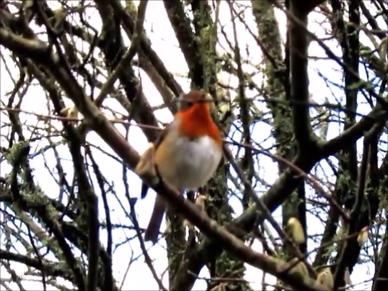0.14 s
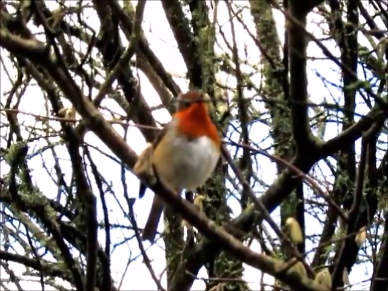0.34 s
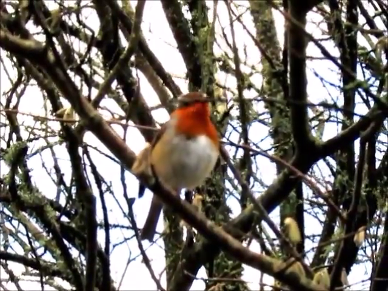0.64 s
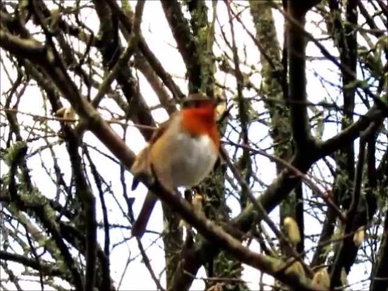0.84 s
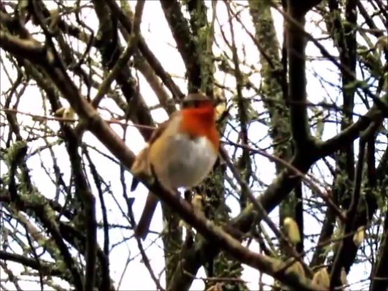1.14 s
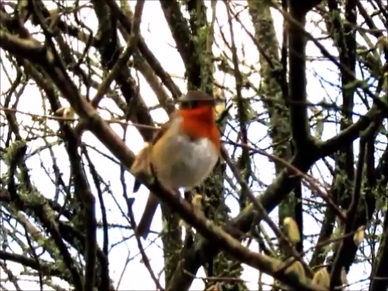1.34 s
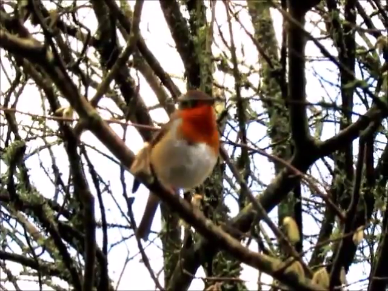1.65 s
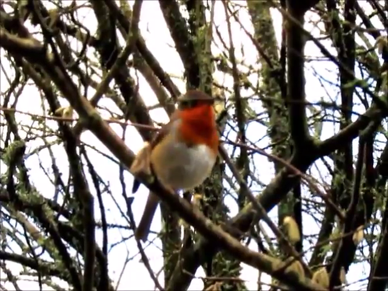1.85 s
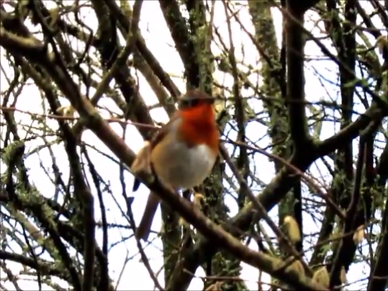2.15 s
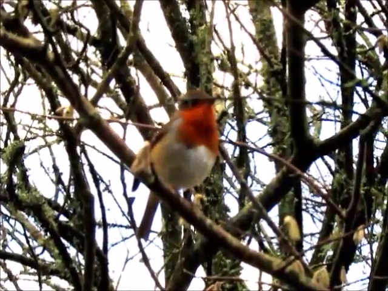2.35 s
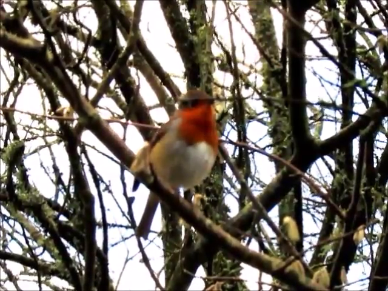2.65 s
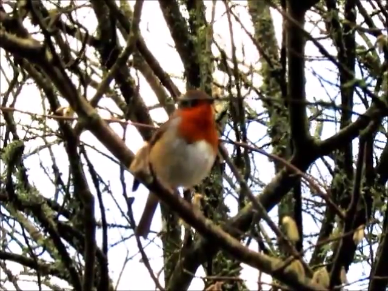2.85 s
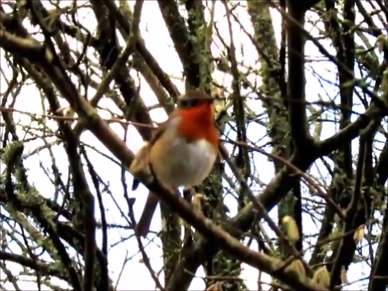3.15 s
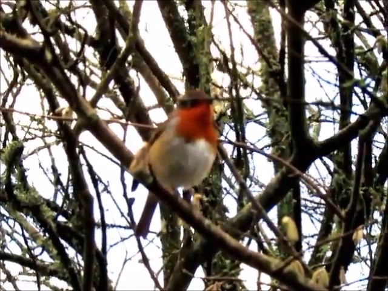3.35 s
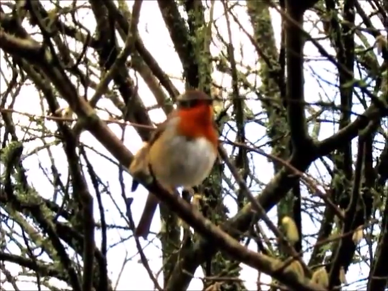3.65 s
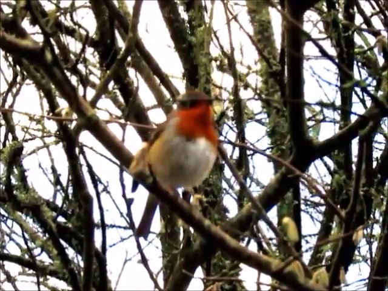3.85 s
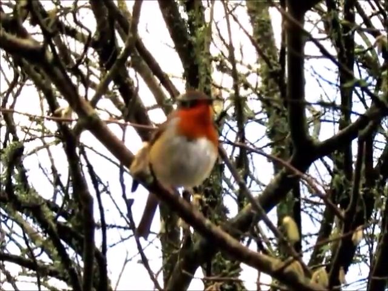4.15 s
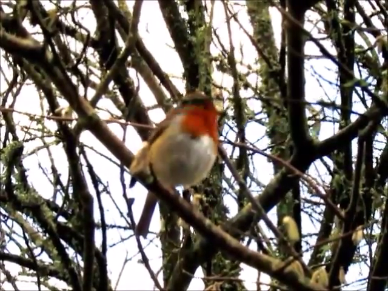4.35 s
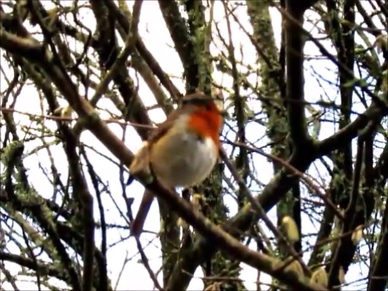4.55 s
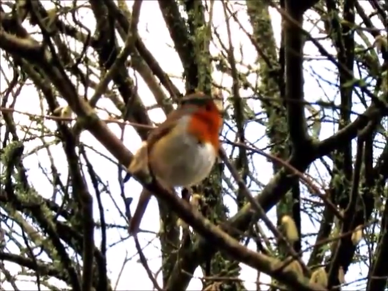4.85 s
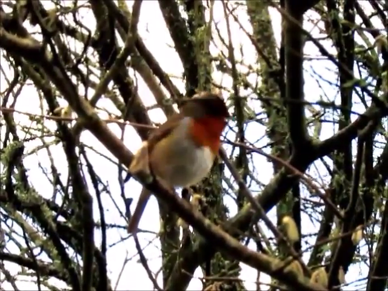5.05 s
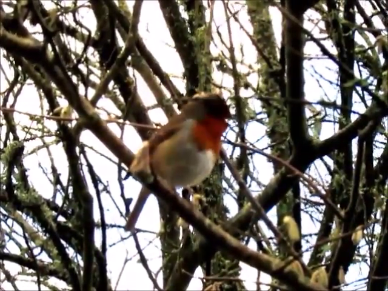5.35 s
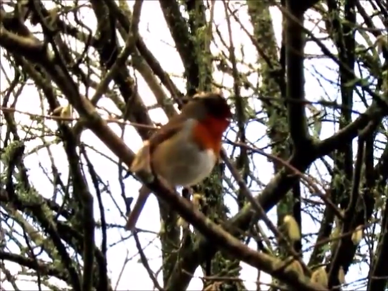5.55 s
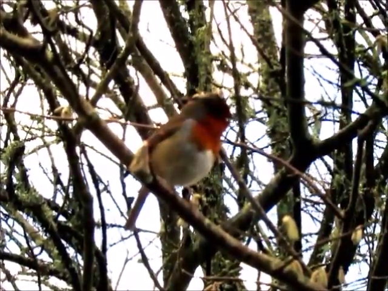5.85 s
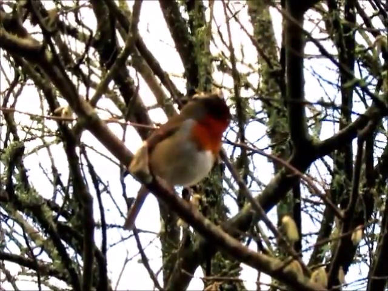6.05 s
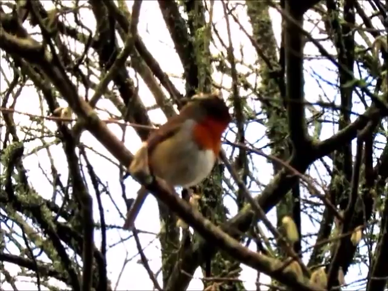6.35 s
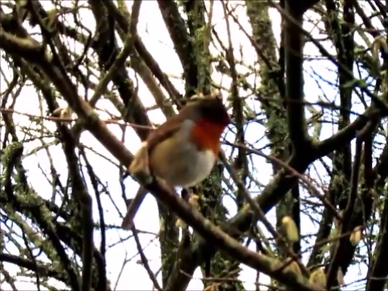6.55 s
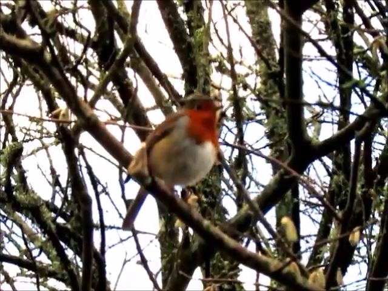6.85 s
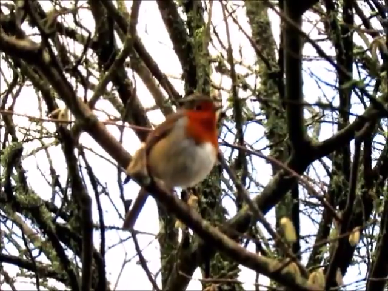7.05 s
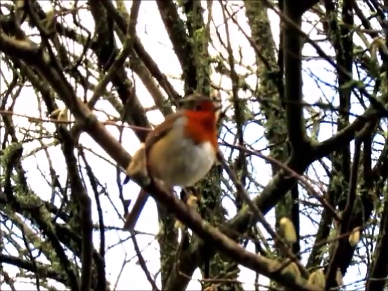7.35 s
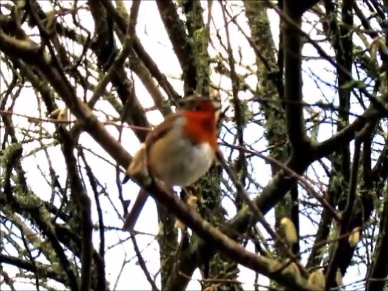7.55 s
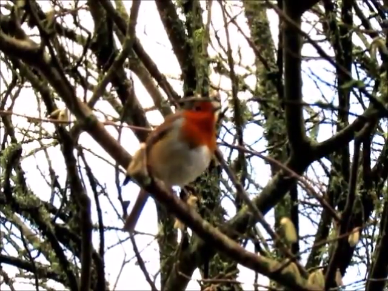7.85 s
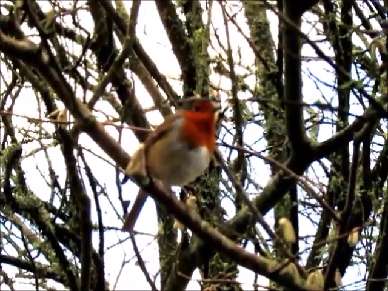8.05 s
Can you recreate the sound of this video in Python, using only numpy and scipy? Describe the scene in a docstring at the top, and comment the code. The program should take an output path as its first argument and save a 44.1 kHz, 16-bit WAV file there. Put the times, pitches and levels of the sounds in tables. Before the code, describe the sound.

Outdoors among bare branches, a close robin opens with a thin, very high whistle, then quick chips and slurs ending in a fuller, lower whistle. A fainter bird twitters in the pause. The robin returns with two tall falling calls and a fast two-toned warbling run that fades away. Soft traffic rumble and a low hum continue underneath. The song is near and almost central, with light woodland echo.

```python
"""In a bare thicket a robin sings two phrases: thin whistles, quick slurs and a run of two-voiced arches.
Each note is a gliding tone; mild nonlinearity adds overtones and rasp, and trunks and twigs scatter it.
A second bird, made of fainter slurs, answers in the pause and once more after the song.
Behind them lie shaped-noise traffic, an engine pulling through its gears as gliding tones,
a low wavering hum with its octave, and two small ticks of decaying noise."""
import sys
import numpy as np
from scipy import signal
from scipy.fft import rfft, irfft, next_fast_len
from scipy.io import wavfile
from scipy.ndimage import uniform_filter1d

SR = 44100
rng = np.random.default_rng(int(sys.argv[2]) if len(sys.argv) > 2 else 0)


def master(y):
    """Save y as 16-bit WAV."""
    cut = np.clip(np.atleast_2d(y).T, -1, 1)
    pcm = np.round(cut * 32767)  # scale
    wavfile.write(sys.argv[1], SR, pcm.astype(np.int16))


N = 361171
TIME = np.arange(N) / SR

# Spectrum of outdoor air and tyres. Each row: frequency in Hz, relative density in dB per Hz.
AIR = [(240, -23.5), (400, -5.5), (490, -3.5), (550, -3), (650, -5.5), (990, -6.5), (1450, -12),
       (2000, -20), (2700, -29), (4800, -34.5), (7800, -32.5), (10500, -34), (15500, -41.5)]
# Spectrum of the traffic drone. Each row: frequency in Hz, relative density in dB per Hz.
RUMBLE = [(50, -23), (90, -5.5), (180, -8), (212, -6.5), (238, 1.5), (265, -2), (300, -1), (345, -2.5),
          (410, -15), (560, -50.5)]
# Spectrum of the deepest traffic. Each row: frequency in Hz, relative density in dB per Hz.
DEEP = [(18, -22.5), (35, -1), (52, 7), (64, 13), (80, -5), (110, -32.5)]
# Course of the deepest traffic. Each row: time in seconds, level in dB before DEEP_LIFT_DB.
DEEP_LEVEL = [(0, -60), (.9, -62), (1.07, -69), (1.3, -58.5), (3.25, -62), (3.55, -66), (4, -61.5),
              (5.55, -59), (6.7, -64), (8.19, -66)]
# Swell of the traffic. Each row: time in seconds, change of the drone in dB, change of the tyres in dB.
TRAFFIC = [(0, -.5, 0.5), (.9, -1.5, 1.5), (2.2, -1, -0.1), (3.3, 0, 0.5), (4.3, -0.2, -0.6), (5.8, 0, 0.5),
           (6.801, 2, 0), (8.19, -0.5, -0.3)]
AIR_DB, DRONE_DB, DEEP_LIFT_DB = -56.5, -52.5, 2
# Likeness of left and right in the background. Each row: frequency in Hz, correlation (no unit).
LIKENESS = [(60, 1), (90, 1), (130, 0.7), (290, 0.75), (450, -0.36), (700, -0.073), (1400, -0.22),
            (3000, 0.26), (7000, 0.37), (15000, 0.11)]

# Pulls of the distant engine. Each row: start in seconds, length in seconds, first firing rate in Hz,
# last firing rate in Hz, level in dB before ENGINE_LIFT_DB.
ENGINE_PULLS = [(1.299, 1.15, 68, 83.5, -62.5), (2.804, 0.75, 58, 61.8, -62.5),
                (3.8, 2.05, 65.5, 79.1, -62), (7.001, 0.97, 63, 63.1, -60)]
ENGINE_LIFT_DB = 2.5
HUM_HZ, HUM_DB = 274, -61.5
HUM_OCTAVE_START_DB, HUM_OCTAVE_RISE_DB_PER_S = -77.5, 1.23
# Dry ticks. Each row: start in seconds, relative level in dB, decay constant in seconds,
# upper corner of the spectrum in Hz.
TICKS = [(0.1274, -41.5, 0.0024, 3150), (3.948, -53, 0.0033, 9150)]

# Colour of the scattered sound. Each row: frequency in Hz, gain in dB.
SCATTER = [(1500, 0), (2600, -4.5), (3600, 3), (5000, 1.5), (6400, 1), (8000, -3), (10000, -1),
           (15000, -6.5)]
# Trunk echoes. Each row: delay in seconds, level in dB, left minus right in dB.
TRUNKS = [(.0096, -16.5, 6), (.016, -15.5, 1), (0.0178, -14, -8), (.031, -28, 8)]
LATE_DB, LATE_T60_S = -20, 0.85  # faint echo from trees further off, relative to the early twigs

# Short scoops of the distant bird. Each row: start in seconds, lowest pitch in Hz, level in dB.
FAR_SCOOPS = [(2.979, 4880, -74), (3.02, 5900, -71.5), (3.083, 5980, -70.5), (3.215, 6600, -65.5),
              (3.264, 5700, -69), (3.414, 3890, -70), (3.449, 3290, -63.5), (3.542, 3010, -68),
              (3.617, 3400, -65)]
# Long notes of the distant bird. Each row: start in seconds, length in seconds, start pitch in Hz,
# middle pitch in Hz, end pitch in Hz, level in dB, swell from start to end in dB.
FAR_SLURS = [(3.66, .31, 3820, 4120, 4200, -75, -20), (7.70, .133, 1420, 1544, 1440, -65, -4)]
FAR_TRIM_DB = -0.5  # direct sound only
SCOOP_S, SCOOP_SWELL_DB = 0.0305, -9.5
SCOOP_FROM, SCOOP_TO = 1.2, 1.05  # start and end pitch against the row's pitch

# First held whistle. Each row: time in seconds, pitch in Hz, level in dB before WHISTLE_TRIM_DB.
THIN_WHISTLE = [(1.11, 9100, -74), (1.18, 8450, -51.5), (1.215, 8200, -57), (1.248, 8240, -41),
                (1.29, 8070, -40.5), (1.32, 8200, -60.5), (1.362, 8090, -36), (1.398, 7950, -32),
                (1.455, 8020, -47), (1.5, 7980, -45), (1.535, 7880, -74)]
# Second, lower whistle. Each row: time in seconds, pitch in Hz, level in dB before WHISTLE_TRIM_DB.
FULL_WHISTLE = [(2.271, 3150, -40), (2.294, 3275, -31.5), (2.321, 3143, -27), (2.345, 3121, -30.5),
                (2.384, 3096, -26.5), (2.399, 3190, -32), (2.436, 3150, -30), (2.452, 3186, -35.5),
                (2.486, 3160, -50)]
WHISTLE_TRIM_DB = -0.7
# Single-voiced slurs. Each row: start in seconds, length in seconds, start pitch in Hz,
# middle pitch in Hz, end pitch in Hz, middle level in dB, swell from start to end in dB.
SLURS = [ (1.613, 0.02, 3540, 3226, 4000, -38.5, 0), (1.635, 0.026, 3360, 2640, 2150, -51, -11),
         (1.66, 0.0094, 3260, 3760, 4200, -48, 3), (1.665, 0.014, 2450, 2210, 2230, -51, -27),
         (1.695, 0.011, 3630, 4130, 3960, -42, -2), (1.701, .008, 3280, 3050, 2850, -38, -7),
         (1.722, .011, 4850, 3730, 3870, -38, 6), (1.834, .024, 1770, 1642, 1510, -53.5, -1),
         (1.878, .016, 3870, 2800, 2430, -40, 3.5), (1.963, 0.061, 2124, 1850, 1950, -53, 13),
         (2.023, 0.027, 1900, 2107, 1820, -51, 7), (2.269, 0.015, 3880, 3680, 3640, -45.5, 2),
         (2.417, 0.031, 3560, 4000, 4220, -45.5, -5), (2.491, .032, 3520, 3020, 2740, -34.5, -10.5),
         (2.516, 0.058, 2730, 2380, 2310, -44.5, -18), (5.42, 0.019, 5650, 6070, 6050, -39.5, -14.5),
         (5.773, 0.029, 5450, 5750, 5240, -41.5, 14), (5.781, 0.058, 6380, 5770, 4300, -41.5, -3),
         (5.822, 0.02, 3900, 4040, 4270, -43, 7), (6.279, 0.057, 4750, 4560, 4360, -63, -4),
         (6.323, 0.105, 4920, 4960, 4990, -70, -16)]
SLUR_EDGE_DB = -3.5  # a slur is softer at its ends

# Chips. Each row: start in seconds, rise in seconds, fall in seconds, crest pitch in Hz, end pitch in Hz,
# crest level in dB, top pitch of the flick in Hz, level of the flick in dB.
CHIPS = [(1.713, .019, 0.0094, 4075, 2495, -34, 5010, -42),
         (1.788, .0136, .0165, 3740, 2337, -31.5, 4840, -35.5),
         (1.942, .013, 0.0083, 2820, 2110, -38, 5340, -42.5),
         (2.121, 0.022, 0.053, 3550, 2175, -33.5, 4600, -42)]
FLICK_FROM_HZ, FLICK_SHARE = 3200, .68  # the flick takes this share of the rise
CHIP_ENTRY_SHARE, CHIP_ENTRY_RATIO = 0.33, 0.76  # entry time within the rise; entry pitch against crest
CHIP_ENTRY_DB, CHIP_END_DB = -4.5, -13.5  # against the crest

# Tall calls that open the second phrase. Each row: start in seconds, length in seconds,
# start pitch in Hz, crest pitch in Hz, level in dB, swell from start to end in dB.
TALL_CALLS = [(4.507, 0.076, 5200, 7490, -55, 9), (4.711, 0.083, 3830, 7450, -47, 7.5)]
TALL_RISE_S, TALL_PLUNGE_S, TALL_START_DB = .018, 0.019, 7  # the start is lifted by these dB
TALL_KNEE_HZ, TALL_END_HZ = 4680, 2870

# Two-voiced arches. Each row: start in seconds, length in seconds, share spent rising (no unit),
# crest pitch of the lower voice in Hz, distance of the upper voice in Hz, lower level in dB,
# upper against lower level in dB, swell of the lower voice in dB, closing drop of the lower voice in Hz.
ARCHES = [(4.873, .078, 0.48, 4530, 654, -38.5, -2, 12, 1200),
          (4.991, .044, 0.73, 4090, 616, -40, 0, 6, 350),
          (5.067, 0.049, 0.6, 4255, 480, -35, -4.5, 0, 1200),
          (5.140, 0.05, 0.7, 3980, 566, -37.5, -5.5, -9, 700),
          (5.216, .044, .7, 4220, 438, -39, -4, -3, 250),
          (5.297, 0.052, 0.83, 4560, 757, -42.5, -3, -15, 450)]
ARCH_FOOT_HZ, ARCH_DROP_SHARE, ARCH_EDGE_DB = 2893, .2, -7

# Swoops. Each row: start in seconds, rise in seconds, sag in seconds, crest pitch in Hz, end pitch in Hz,
# exponent of the sag (no unit), crest level in dB, swell over the sag in dB,
# pitch ratio of the lower voice (no unit), its relative level in dB.
SWOOPS = [(5.391, 0.016, 0.067, 6150, 4280, 2.1, -35, -12, .655, -7),
          (5.521, 0.018, 0.044, 6230, 5320, 1.05, -38.5, 6, 0.78, -8),
          (5.641, .025, .04, 6140, 5370, 1.09, -38, -1.5, .83, -7)]
SWOOP_FOOT_HZ, SWOOP_FOOT_DB = 3080, -8.5

# Closing three-note figures. Each row: start in seconds, lead pitch in Hz, high pitch in Hz,
# lead level in dB, high level in dB, low level in dB.
FIGURES = [(5.885, 5700, 6380, -45, -38, -44.5), (6.028, 5040, 6220, -54.5, -49, -45),
           (6.153, 5150, 5710, -59, -53.5, -49.5)]
LEAD_S, HIGH_AT_S, HIGH_S, LOW_AT_S, LOW_S = 0.044, .034, 0.0304, .058, 0.0225
LEAD_FALL, HIGH_FALL, LOW_FALL = 0.023, 0.046, .14  # share of the pitch lost over each note
LOW_RATIO = .745  # low against high pitch

# Octave overtone as the open beak radiates it. Each row: frequency in Hz, gain in dB.
BEAK = [(4000, -46), (5200, -42), (6500, -36.5), (7500, -27), (9000, -24.5), (10200, -14), (11400, -24.5),
        (13000, -18), (15500, -35)]
# Difference between the two microphones. Each row: frequency in Hz, left minus right in dB.
MIC_BALANCE = [(150, 0), (700, 1.5), (1400, 1), (3100, 0.5), (5200, 0.5), (8000, 0), (12500, 1)]
TOP_HZ = 15700


def undb(db):
    """Logarithmic level: decibels become an amplitude gain."""
    return 10 ** (np.asarray(db) / 20)


def unit(x):
    """Normalisation of power: scale to an rms of one."""
    return x / np.sqrt(np.mean(x ** 2))


def bin_hz():
    """Discrete spectrum: the frequency of every FFT bin."""
    return np.fft.rfftfreq(next_fast_len(N), 1 / SR)


def on_bins(points):
    """Interpolation along log frequency: read (Hz, value) points at every FFT bin."""
    hz, value = np.transpose(points)
    return np.interp(np.log(bin_hz() + 1), np.log(hz), value)


def shape(x, gain):
    """Linear filtering: weight every FFT bin by a gain."""
    size = next_fast_len(N)
    return irfft(rfft(x, size) * gain, size)[..., :N]


def walk(rate):
    """Band-limited modulation: a smooth random wander, `rate` knots a second, with a spread near one."""
    knots = rng.standard_normal(int(N / SR * rate) + 2)
    wander = np.interp(TIME * rate, np.arange(len(knots)), knots)
    return 1.272 * uniform_filter1d(wander, int(SR / rate / 2) + 1)


def pan(db):
    """Interaural level difference: left and right gains."""
    return undb(np.array([[db], [-db]]) / 2)


def progress(length_s):
    """Normalised time: from 0 to 1 over a length of time."""
    return np.linspace(0, 1, max(int(length_s * SR), 8))


def add(track, start, hz, db, fade_s, waver):
    """Phase is the integral of frequency: add a gliding tone with soft ends to a complex track."""
    begin = int(start * SR)
    span = slice(begin, min(begin + len(hz), N))
    count = span.stop - span.start
    t = np.arange(len(hz)) / SR
    gate = np.sin(np.pi / 2 * np.clip(np.minimum(t, t[-1] - t) / fade_s, 0, 1)) ** 2
    phase = 2 * np.pi * np.cumsum(hz[:count] * (1 + waver[span])) / SR
    amplitude = np.sqrt(2) * undb(db) * gate  # the level is the rms of the real part
    track[span] += amplitude[:count] * np.exp(1j * phase)


def held(curves, fade_s, waver):
    """Frequency and amplitude modulation: tones that follow (s, Hz, dB) curves."""
    track = np.zeros(N, complex)
    for curve in curves:
        s, hz, db = np.transpose(curve)
        t = np.arange(max(s[0], 0), s[-1], 1 / SR)
        add(track, t[0], np.interp(t, s, hz), np.interp(t, s, db), fade_s, waver)
    return track


def sing(notes, waver):
    """Superposition of (start, pitches, levels) notes; longer ones start more softly."""
    track = np.zeros(N, complex)
    for start, hz, db in notes:
        fade_s = max(.0022, .1 * len(hz) / SR)
        add(track, start, hz, db, fade_s, waver)
    return track


def diffuse(spectrum):
    """Diffuse field: mid and side noise set the left-right correlation at each frequency."""
    likeness = np.clip(on_bins(LIKENESS), -.99, .99)
    gain = undb(on_bins(spectrum))
    mid = shape(rng.standard_normal(N), gain * np.sqrt(1 + likeness))
    side = shape(rng.standard_normal(N), gain * np.sqrt(1 - likeness))
    return np.array([mid + side, mid - side]) / np.std(mid)


def traffic():
    """Incoherent sum of noise bands: a deep swell, a drone and a wash of tyres under even hiss."""
    deep_db = DEEP_LIFT_DB + np.interp(TIME, *np.transpose(DEEP_LEVEL))
    deep = diffuse(DEEP) * undb(deep_db + 2.0 * walk(7.2))
    s, drone_db, tyres_db = np.transpose(TRAFFIC)
    drone = diffuse(RUMBLE) * undb(DRONE_DB + np.interp(TIME, s, drone_db) + 1.06 * walk(6))
    air = diffuse(AIR) * undb(AIR_DB)
    # only the tyre band swells; the hiss above it stays even
    wash = shape(air, on_bins([(1800, 0.52), (3000, 0)]))  # linear gain
    swell = undb(np.interp(TIME, s, tyres_db) + 0.395 * walk(4.84))
    return deep + drone + air + wash * (swell - 1)


def engine():
    """Periodic firing: a tone at the firing rate glides over each pull in a gear."""
    pulls = []
    for s, length, from_hz, to_hz, db in ENGINE_PULLS:
        pulls.append([(s, from_hz, db), (s + length, to_hz, db)])
    firing = held(pulls, 0.13, 0.0056 * walk(9.43))
    return firing.real * undb(ENGINE_LIFT_DB + 0.79 * walk(12))


def hum():
    """Harmonic pair: a wavering fundamental and its octave, which slowly grows stronger."""
    phase = 2 * np.pi * np.cumsum(HUM_HZ * (1 + 0.00395 * walk(6))) / SR
    fundamental = undb(HUM_DB + 1.8 * walk(1.2)) * np.sin(phase)
    octave_db = HUM_OCTAVE_START_DB + HUM_OCTAVE_RISE_DB_PER_S * TIME
    octave = undb(octave_db + 2 * walk(0.904)) * np.sin(2 * phase)
    return np.sqrt(2) * (fundamental + octave)


def ticks():
    """Damped transients: noise bursts with a sharp onset that die within milliseconds."""
    out = np.zeros((2, N))
    for s, db, decay, top_hz in TICKS:
        age = np.maximum(TIME - s, 0)
        colour = undb(on_bins([(200, 0), (1500, -3), (top_hz, -11), (2.6 * top_hz, -28)]))
        crack = unit(shape(rng.standard_normal((2, N)), colour))
        envelope = np.exp(-age / decay) * (1 - np.exp(-age / 0.00023))
        # mostly one noise for both ears, a little louder on the left; only the right ear gets a little of its
        # own
        out += undb(db) * (crack[0] + 0.28 * crack) * envelope
    return out


def thicket(x, twigs_db, t60, spread):
    """Multiple scattering: a few trunk echoes and a dense, fading spray of twig reflections."""
    t = TIME[:N // 12]
    hits = rng.random(len(t)) < 3000 / SR  # on average 3000 reflections a second
    twigs = hits * rng.exponential(size=len(t)) ** .5
    mid, side = rng.standard_normal((2, len(t))) * twigs
    decay = undb(-60 * t / t60) + undb(LATE_DB - 60 * t / LATE_T60_S)
    fade = decay * (1 - np.exp(-t / 0.001407))
    response = np.array([mid + spread * side, mid - spread * side]) * fade
    response = undb(twigs_db) * response / np.sqrt(np.sum(response ** 2) / 2)
    for delay, db, pan_db in TRUNKS:
        response[:, int(delay * SR)] += undb(db) * pan(pan_db)[:, 0]
    coloured = shape(x, undb(on_bins(SCATTER)))
    return signal.fftconvolve(coloured[None], response, axes=1)[:, :N]


def slur(start, length, from_hz, middle_hz, to_hz, db, swell_db):
    """Quadratic glide: one voice bends smoothly through three pitches."""
    u = 2 * progress(length) - 1
    slope, bend = (to_hz - from_hz) / 2, (from_hz + to_hz) / 2 - middle_hz
    hz = middle_hz + slope * u + bend * u ** 2
    return start, hz, db + swell_db * u / 2 + SLUR_EDGE_DB * u ** 2


def far_bird():
    """Frequency glides at a distance: dips through short scoops and a few drawn-out notes."""
    notes = [slur(*row) for row in FAR_SLURS]
    for s, hz, db in FAR_SCOOPS:
        notes.append(slur(s, SCOOP_S, hz * SCOOP_FROM, hz, hz * SCOOP_TO, db, SCOOP_SWELL_DB))
    return sing(notes, 0.01 * walk(300)).real


def chips():
    """Two independent voices: one flicks upward, the other enters under it, crests and tumbles."""
    for start, rise, fall, crest_hz, end_hz, db, top_hz, flick_db in CHIPS:
        flick = progress(FLICK_SHARE * rise)
        yield start, FLICK_FROM_HZ + (top_hz - FLICK_FROM_HZ) * flick, flick_db
        up, down = 1 - progress(rise * (1 - CHIP_ENTRY_SHARE)), progress(fall)
        climb_hz = crest_hz * (1 - (1 - CHIP_ENTRY_RATIO) * up ** 1.8)
        tumble_hz = end_hz + (crest_hz - end_hz) * (1 - down) ** 1.35
        level_db = db + np.r_[CHIP_ENTRY_DB * up, CHIP_END_DB * down ** 1.8]
        yield start + CHIP_ENTRY_SHARE * rise, np.r_[climb_hz, tumble_hz], level_db


def tall_calls():
    """Piecewise glide: one voice shoots up, slides down evenly and plunges at the end."""
    for start, length, from_hz, crest_hz, db, swell_db in TALL_CALLS:
        u = progress(length)
        t = u * length
        corners_s = [TALL_RISE_S, length - TALL_PLUNGE_S, length]
        hz = np.interp(t, corners_s, [crest_hz, TALL_KNEE_HZ, TALL_END_HZ])
        up = np.maximum(1 - t / TALL_RISE_S, 0)
        level_db = db + swell_db * (u - .5) + TALL_START_DB * up
        yield start, hz + (from_hz - crest_hz) * up ** 1.8, level_db


def arches():
    """Parallel motion: two voices climb a fixed distance apart, level off and drop unequally."""
    for start, length, rise, crest_hz, upper_hz, db, upper_db, swell_db, drop_hz in ARCHES:
        u = progress(length)
        up = np.maximum(1 - u / rise, 0)
        down = np.maximum(1 - (1 - u) / ARCH_DROP_SHARE, 0)
        hz = crest_hz + (ARCH_FOOT_HZ - crest_hz) * up ** 1.7
        level_db = db + ARCH_EDGE_DB * (2 * u - 1) ** 2
        yield start, hz - drop_hz * down ** 1.4, level_db + swell_db * (u - .5)
        yield start, hz + upper_hz - 0.26 * drop_hz * down ** 2.0, level_db + upper_db


def swoops():
    """Constant pitch ratio: a steep climb and a long sag, shadowed by the lower voice."""
    for start, rise, sag, crest_hz, end_hz, curve, db, swell_db, ratio, lower_db in SWOOPS:
        up, down = 1 - progress(rise), progress(sag)
        climb_hz = crest_hz + (SWOOP_FOOT_HZ - crest_hz) * up ** 2.2
        sag_hz = end_hz + (crest_hz - end_hz) * (1 - down) ** curve
        hz = np.r_[climb_hz, sag_hz]
        level_db = db + np.r_[SWOOP_FOOT_DB * up ** 1.9, swell_db * down]
        yield start, hz, level_db
        yield start, hz * ratio, level_db + lower_db


def figures():
    """Overlapping glides: lead-in, high note and low note, each sinking more than the one before."""
    for start, lead_hz, high_hz, lead_db, high_db, low_db in FIGURES:
        parts = [(0, LEAD_S, lead_hz, LEAD_FALL, lead_db),
                 (HIGH_AT_S, HIGH_S, high_hz, HIGH_FALL, high_db),
                 (LOW_AT_S, LOW_S, high_hz * LOW_RATIO, LOW_FALL, low_db)]
        for delay, length, hz, fall, db in parts:
            yield slur(start + delay, length, hz * (1 + fall / 2), hz, hz * (1 - fall / 2), db, 0)


def robin(overtone_growth=0.79):
    """Nonlinear mixing in the syrinx: nearly pure voices yield weak overtones and sum tones."""
    notes = [*(slur(*row) for row in SLURS), *chips(), *tall_calls(), *arches(), *swoops(), *figures()]
    quick = sing(notes, 0.0047 * walk(450)) * undb(1.83 * walk(260))
    whistles = held([THIN_WHISTLE, FULL_WHISTLE], 0.0039, 0.0027 * walk(140))
    voices = quick + whistles * undb(WHISTLE_TRIM_DB + 2.0 * walk(130))
    effort = uniform_filter1d(np.abs(voices), size=130) + 1e-9  # smoothed over about 3 ms
    swing = voices / effort
    # soft notes are reedier: overtones grow more slowly than the fundamental
    reed = undb(-39.5) * (effort / undb(-40)) ** overtone_growth
    octave = shape((reed * swing ** 2).real * undb(2 * walk(200)), undb(on_bins(BEAK)))
    twelfth = undb(-42.5) * (reed * swing ** 3).real
    # where the two voices beat, they grow side tones and a trace of rasp
    beat = np.abs(swing) ** 2 - 1
    tone = (voices * (1 - 0.089 * beat)).real
    hiss_colour = undb(on_bins([(3000, -18.5), (6000, 6), (9000, 5), (15000, 0)]))
    hiss = unit(shape(rng.standard_normal(N), hiss_colour))
    rasp = np.abs(quick) * (0.67 + np.abs(beat)) * hiss
    return tone + octave + twelfth + undb(-33) * rasp


def scene(right_leads_s=4e-6):
    """Superposition: the background, the far bird and the near robin, a hair right of centre by delay."""
    background = traffic() + engine() + hum() + ticks()
    far = far_bird()
    far_heard = undb(FAR_TRIM_DB) * far + thicket(far, twigs_db=0.0, t60=0.49, spread=0.5)
    song = robin()
    lead = np.exp(1j * np.pi * right_leads_s * np.outer([-1, 1], bin_hz()))
    near_heard = shape(song, lead) + thicket(song, twigs_db=-6.5, t60=0.31, spread=0.32)
    return background + far_heard + near_heard


def record(dry):
    """Transducer response: two slightly unequal microphones, then an elliptic low-pass."""
    heard = shape(dry, undb(np.outer([.5, -.5], on_bins(MIC_BALANCE))))
    low_pass = signal.ellip(10, .2, 70, TOP_HZ, fs=SR, output="sos")
    return signal.sosfilt(low_pass, heard)


dry = scene()
out = record(dry)
master(out)
```